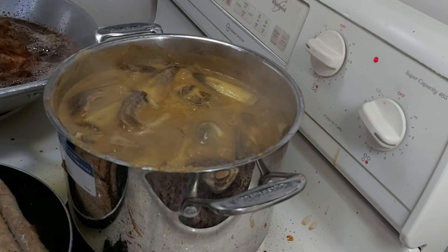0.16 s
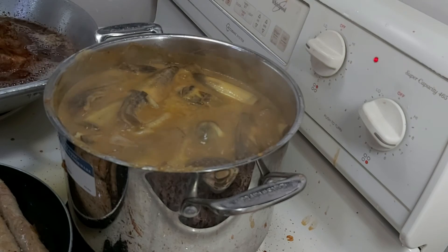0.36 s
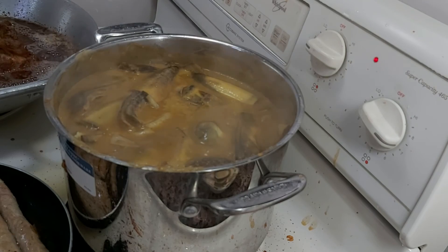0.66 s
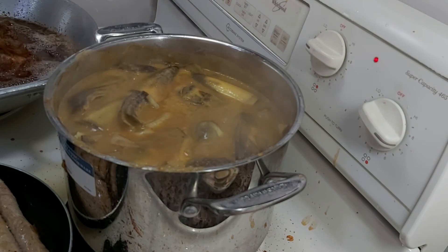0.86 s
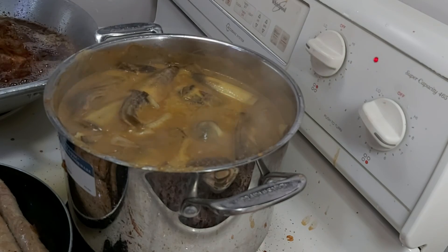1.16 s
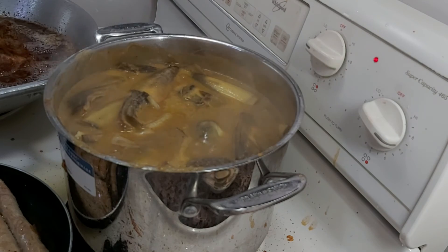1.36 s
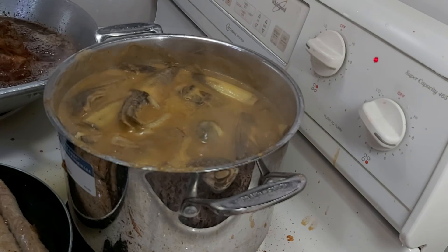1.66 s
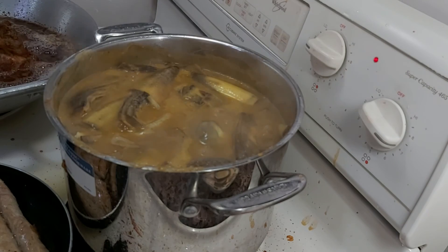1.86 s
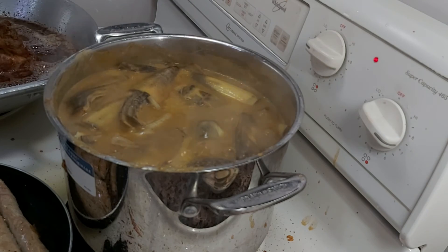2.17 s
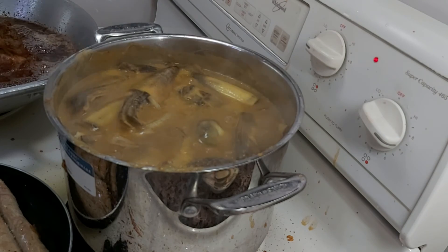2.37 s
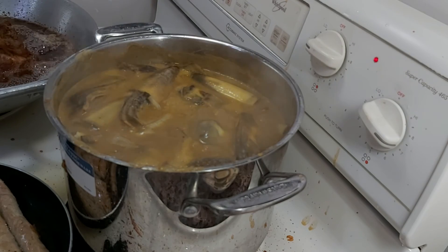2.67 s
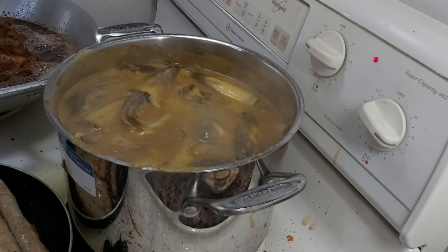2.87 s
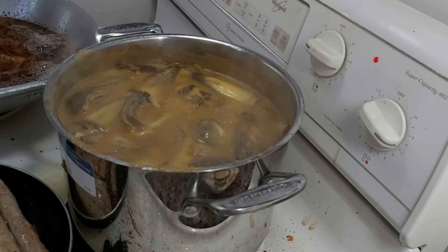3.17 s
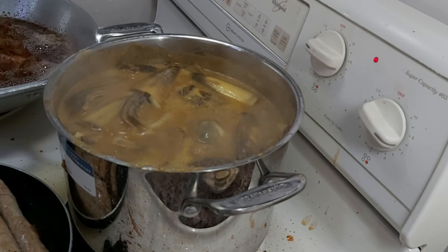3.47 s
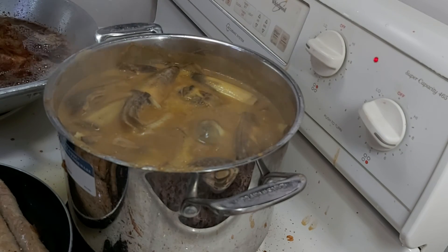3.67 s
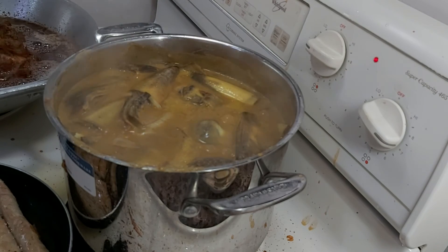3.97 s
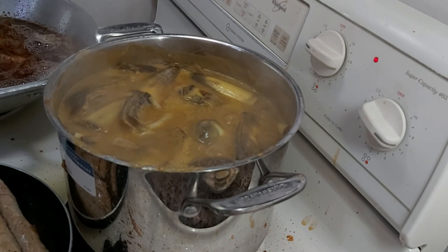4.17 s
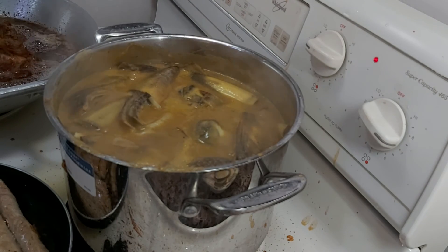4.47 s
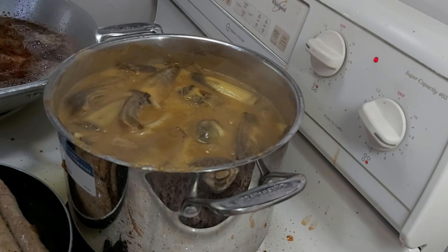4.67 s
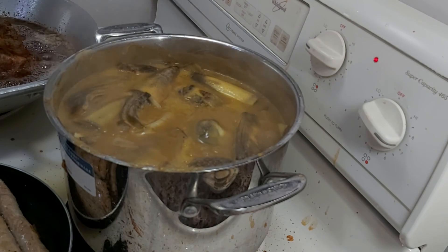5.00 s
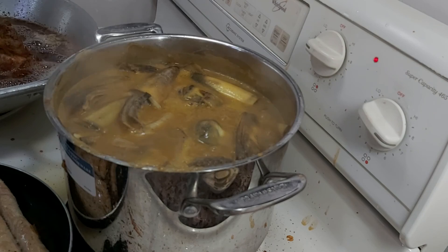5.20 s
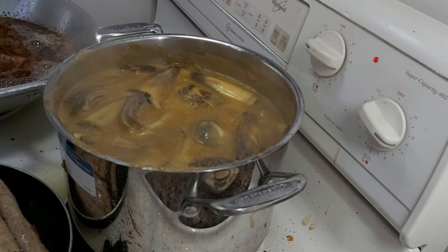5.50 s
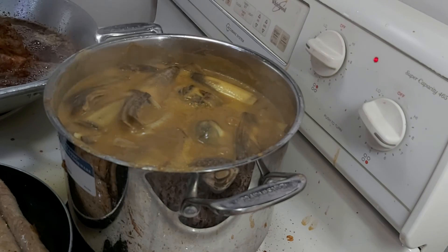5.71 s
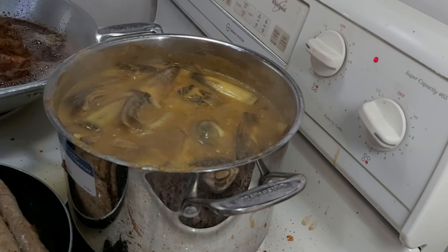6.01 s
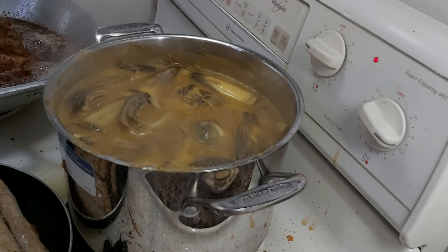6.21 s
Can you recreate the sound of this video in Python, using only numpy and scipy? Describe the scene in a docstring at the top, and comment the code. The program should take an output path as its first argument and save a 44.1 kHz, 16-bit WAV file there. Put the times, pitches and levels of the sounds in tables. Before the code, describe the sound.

A fan and a low electrical hum drone steadily in a kitchen. Slightly to the right, a pot of stew gives off a hiss of steam that soon thins to soft bubbling, splutters and wet ticks. Near the end comes a dull, hollow knock, then a quick run of ringing metal clanks and a softer knock, as the stew keeps simmering.

```python
"""A kitchen, at an electric stove, with the pot a little right of a stereo pair of microphones.
Behind it drone a cooling fan, a compressor and mains hum. Thick stew simmers in the steel pot: steam hisses
for two seconds, then thins to fizz, small bubbles and spits. Late on, something is set down with a dull
knock and metal cookware clanks a few times; the recorder's gain control ducks and creeps back."""
import sys
import numpy as np
from scipy import signal
from scipy.fft import rfft, irfft
from scipy.io import wavfile
from scipy.ndimage import uniform_filter1d, map_coordinates

SR = 44100
rng = np.random.default_rng(int(sys.argv[2]) if len(sys.argv) > 2 else 0)


def persist_wave(psi):
    """Save psi, clipped to +-1, as 16-bit WAV."""
    counts = np.round(np.clip(psi, -1, 1) * 32767).astype(np.int16)
    wavfile.write(sys.argv[1], SR, np.atleast_2d(counts).T)


N = 279934
TIME = np.arange(N) / SR
FREQS = np.fft.rfftfreq(N, 1 / SR)


def undb(db):
    """Decibels to gain."""
    return 10 ** (np.asarray(db) / 20)


def unit(x):
    """Scale to rms 1."""
    return x / np.sqrt(np.mean(x ** 2))


def sides(pan_db):
    """Gains at the two microphones for a left-minus-right level difference."""
    return undb(np.array([[.5], [-.5]]) * pan_db)


def curve(table):
    """A table of levels in time, sample by sample."""
    return np.interp(TIME, *np.transpose(table))


def across(table, column=1):
    """One column of a spectrum table, interpolated over log frequency."""
    rows = np.array(table)
    return np.interp(np.log(FREQS + 1), np.log(rows[:, 0]), rows[:, column])


def colour(x, spectrum):
    """Filter by a spectrum table and scale to rms 1."""
    return unit(irfft(rfft(x) * undb(across(spectrum)), N))


def noise(spectrum):
    """Unrelated left and right noise of one colour, rms 1."""
    return colour(rng.standard_normal((2, N)), spectrum)


def walk(per_s):
    """Smoothly joined random values, spread about 1."""
    knots = rng.standard_normal(1024)
    return map_coordinates(knots, [TIME * per_s], order=3, mode="wrap")


def fade(t60, size=22050):
    """Exponential decay, 60 dB in t60 seconds."""
    return np.exp(-np.log(1000) * TIME[:size] / t60)


def add(out, s, sound):
    """Mix a sound in at s seconds."""
    start = max(int(s * SR), 0)
    out[:, start:start + sound.shape[-1]] += sound[..., :max(N - start, 0)]


def bursts(times, levels_db, spectrum, t60, tail_db, tail_t60):
    """A quick burst of noise at each time, with a weaker, longer tail."""
    decay_power = fade(t60) ** 2 + (undb(tail_db) * fade(tail_t60)) ** 2
    power = np.zeros((1, N))
    for s, db in zip(times, levels_db):
        add(power, s, undb(db) ** 2 * decay_power)
    return np.sqrt(power) * noise(spectrum)


def scatter(x, t60, wet_db, size=22050):
    """Direct sound plus dense reflections, different at each microphone."""
    echoes = rng.standard_normal((2, size)) * fade(t60, size)
    echoes *= undb(wet_db) / np.sqrt(np.sum(echoes ** 2) / 2)
    return x + signal.fftconvolve(x, echoes, axes=1)[:, :N]


# moving air in the background: f/Hz, level/dB per Hz
AIR_SPECTRUM = [(20, -75), (45, -71), (90, -60.5), (150, -65), (250, -64.5), (300, -69.5), (420, -60.5),
                (520, -64.5), (680, -61), (880, -62), (1200, -72), (1600, -71), (3500, -78.5),
                (16000, -91.5)]
# resonances of the fan housing: f/Hz, width/Hz, lift/dB
HOUSING_RESONANCES = [(210.4, 34, 12), (365.8, 65.5, 14.5)]
# the air at the two microphones: f/Hz, likeness/0-1, left minus right/dB
AIR_AT_MICS = [(60, 0.6, -10), (200, 0.91, -6), (380, 0.99, -7), (705, 0.47, -4), (1400, 0, -1.5),
               (5000, 0, -1)]


def fan_air():
    """The fan's rush, lifted by its housing; the bass is alike at both microphones."""
    db = across(AIR_SPECTRUM)
    for hz, width, lift_db in HOUSING_RESONANCES:
        db += lift_db / (1 + (2 * (FREQS - hz) / width) ** 2)
    likeness, pan_db = across(AIR_AT_MICS), across(AIR_AT_MICS, column=2)
    mid, side = rfft(rng.standard_normal((2, N)))
    mid *= np.sqrt((1 + likeness) / 2)
    side *= np.sqrt((1 - likeness) / 2)
    rush = irfft(np.array([mid + side, mid - side]) * undb(db) * sides(pan_db), N)
    return np.sqrt(SR / 2) * rush * undb(.4 * walk(7))


# tones of the five-bladed fan, mostly to the right: multiple of shaft rate, level/dB, left minus right/dB
FAN_HARMONICS = [(1, -52, -4), (2, -49.5, 1), (3, -52.5, -8), (5, -27, -3), (10, -34, -10), (15, -45, 3),
                 (17, -47, -6)]
# slow swell of the blade tone: t/s, level/dB
BLADE_SWELL = [(0, -1), (1.8, 1.6), (2.7, -2.3), (3.5, -1.1), (5.4, 0.5), (6.35, -1.5)]
# compressor shaft and mains hum, to the right: f/Hz, level/dB, left minus right/dB
HUM_TONES = [(58.2, -26, -5), (119.95, -38, -2.5), (352, -44.5, -2)]


def motors(blade_hz=219.45, blades=5, wander=.0012, flutter_db=.84):
    """The compressor and mains hum steadily; the fan's tones flutter in its own turbulence."""
    shaft_hz = blade_hz / blades * (1 + wander * walk(2.396))
    shaft_phase = 2 * np.pi * np.cumsum(shaft_hz) / SR
    out = np.zeros((2, N))
    for order, db, pan_db in FAN_HARMONICS:
        swell_db = curve(BLADE_SWELL) if order == blades else 0
        gain = undb(db + swell_db + flutter_db * walk(12))
        out += sides(pan_db) * gain * np.sin(order * shaft_phase + 2 * np.pi * rng.random())
    for hz, db, pan_db in HUM_TONES:
        gain = undb(db + .087 * walk(.46))
        out += sides(pan_db) * gain * np.sin(2 * np.pi * (hz * TIME + rng.random()))
    return np.sqrt(2) * out


# dull knocks, right of centre: t/s, level/dB, thump relative to that level/dB
KNOCK_HITS = [(4.5753, -16, -1), (4.586, -23.5, 14), (4.602, -18.5, -3), (4.621, -24.5, 4), (5.42, -26, 6)]
# colour of the contact: f/Hz, level/dB
KNOCK_SPECTRUM = [(100, -20), (300, 2), (850, 7.5), (1300, 2), (2500, -8), (4500, -14.5), (7000, -15.5),
                  (16000, -17.5)]
# hollow note of the knocked surface: f/Hz, level/dB, t60/s
HOLLOW_MODES = [(228, -5, 0.1), (327.6, -4, 0.19), (757, -15, 0.13)]


def knocks():
    """Something is set down: a rattling contact, a low thump and the hollow note of the surface below."""
    times, db, thump_db = np.transpose(KNOCK_HITS)
    contact = bursts(times, db, KNOCK_SPECTRUM, t60=.092, tail_db=-7, tail_t60=.4)
    thump_spectrum = [(60, -34), (130, -18), (195, -5), (250, -9),
                      (335, 0), (520, -8), (1200, -30), (16000, -70)]
    thump = bursts(times, db + thump_db - 7, thump_spectrum, t60=.071, tail_db=-10, tail_t60=.31)[0]
    note = sum(undb(mode_db) * fade(t60, N) * np.sin(2 * np.pi * hz * TIME)
               for hz, mode_db, t60 in HOLLOW_MODES)
    hollow = np.zeros((1, N))
    for s, level_db in zip(times, db + thump_db):
        add(hollow, s, undb(level_db) * note)
    return (contact + thump + hollow) * sides(-3.5)


# blows of the cookware, right of centre: t/s, ring/dB, crack/dB, clunk/dB, spot/0 rim to 1 wall
COOKWARE_BLOWS = [(4.8753, -23, -19.5, -18, .1), (4.8809, -15, -18, -9, 0),
                  (4.933, -23.5, -24.5, -16.5, 0.06), (4.989, -25, -23, -21, 0.97),
                  (5.1191, -20.5, -28.5, -20, 1), (5.231, -27, -19, -17, 1), (5.2618, -31, -18, -26, 0.88),
                  (5.2683, -19.5, -24, -19, 0.69)]
# modes of the metal: f/Hz, level struck at the rim/dB, level struck at the wall/dB, t60/s
COOKWARE_MODES = [(622, -7, -10, .16), (657, -8, -17, .24), (782, -8, -20, .13), (1040, -18, -7, .1),
                  (1118, -15, 0, .11), (1150, -15, -6, .13), (1205, -14, -10, .26), (1526, -2.5, -16, .26),
                  (1688, -7, -11, .26), (1808, -8, -8, .2), (1850, 0, -7, .23), (1882, -12, -3, .24),
                  (1926, -3, -11, .16), (2038, -3, -20, .09), (2370, -13, -22, .08), (2712, -11, -19, .15),
                  (2790, -9, -10, .12), (2950, -21, -15, .15), (4215, -19, -24, .18), (8301, -29, -29, .2)]
# colours of a metal contact's sharp crack and duller clunk: f/Hz, level/dB
CRACK_SPECTRUM = [(300, -14), (1200, -2), (2200, -.5), (2800, 0), (3400, -4), (4200, 1.5), (5500, -2),
                  (6600, -3), (8300, .5), (10000, -3.5), (12500, -5.5), (16000, -15)]
CLUNK_SPECTRUM = [(200, -20), (620, -1), (900, -7), (1150, -5), (1400, -3), (1900, 3), (2130, -7),
                  (2350, -6), (2530, -11), (2750, -5), (3200, -20), (5000, -24), (16000, -45)]


def cookware(detune=.0011, chatter_db=2.5, lower_from_s=5.2, lower_ratio=.975):
    """Each blow cracks, clunks and rings the metal; the spot struck sets the mix of modes."""
    times, ring_db, crack_db, clunk_db, spots = np.transpose(COOKWARE_BLOWS)
    hz, rim_db, wall_db, t60 = np.transpose(COOKWARE_MODES)
    decays = np.array([fade(t) for t in t60])
    age = TIME[:decays.shape[1]]
    ring = np.zeros((2, N))
    for s, db, spot in zip(times, ring_db, spots):
        drift, start, lag = rng.standard_normal((3, len(hz)))
        pitch = hz * (lower_ratio if s > lower_from_s else 1) * (1 + detune * drift)
        # each mode reaches the two microphones with its own phase
        mic_offsets = np.array([start, start + lag / 4])[:, :, None]
        phase = 2 * np.pi * (np.outer(pitch, age) + mic_offsets)
        strength = undb(db + (1 - spot) * rim_db + spot * wall_db)
        add(ring, s, (strength[:, None] * decays * np.sin(phase)).sum(axis=1))
    ring *= undb(chatter_db * walk(140))  # the loose contact makes the ring chatter
    crack = bursts(times, crack_db, CRACK_SPECTRUM, t60=.06, tail_db=-11, tail_t60=.42)
    clunk = bursts(times, clunk_db, CLUNK_SPECTRUM, t60=.055, tail_db=-15, tail_t60=.55)
    return (scatter(ring, t60=.4, wet_db=-12) + crack + clunk + rattles(times, crack_db)) * sides(-3)


def rattles(blow_times, crack_db, count=3, within_s=.12, drop_db=7.5, fade_db_per_s=61):
    """The metal rebounds faintly at random moments after each blow, weaker the later it falls."""
    times = np.repeat(blow_times, count)
    slots = np.arange(len(times)) % count
    delay = within_s * (slots + rng.random(len(times))) / count
    db = np.repeat(crack_db, count) - drop_db - fade_db_per_s * delay
    return bursts(times + delay, db, CRACK_SPECTRUM, t60=.03, tail_db=-13, tail_t60=.2)


# colour of the steam hiss at the pot: f/Hz, level/dB
STEAM_SPECTRUM = [(500, -12), (1500, -3.5), (3200, -2.6), (4200, -1.2), (5200, -3.3), (6700, -3.5),
                  (7700, -.7), (9800, 0), (11900, 2.2), (13500, -2), (16000, -4.5)]
# colour of bursting films, in fizz and froth: f/Hz, level/dB
FILM_SPECTRUM = [(2000, -16), (5300, -8.5), (8500, 0), (12000, 0), (15000, -4), (16000, -8)]


def steam(jet_db=-29.5, vent_closes_s=2.01, simmer_db=-47, fizz_db=-51, count=1500):
    """A jet blows until its vent closes, leaving a quiet hiss and the fizz of many tiny bursts."""
    since = np.maximum(TIME - vent_closes_s, 0)
    drop_db = 5 * np.minimum(since / .019, 1) + 13.5 * since  # drops at once, then dies away
    jet = undb(jet_db - drop_db + .82 * walk(24.6))
    hiss = noise(STEAM_SPECTRUM) * np.hypot(jet, undb(simmer_db + 3.1 * walk(25.1)))
    ticks = np.zeros((2, N))
    for when, strength, place in rng.random((count, 3)):
        tick_db = 5 * min(-np.log(1 - strength), 4)  # many weak, few strong
        add(ticks, when * N / SR, undb(tick_db) * sides(16 * (place - .5)))
    fizz = colour(scatter(ticks, t60=.02, wet_db=6), FILM_SPECTRUM)
    return (hiss + undb(fizz_db) * fizz) * sides(-2.4)


def bubble(hz, cycles, glide=.13, size=1500):
    """A bubble rings for some cycles, rising a little as it opens."""
    age = TIME[:size] * hz / cycles
    phase = 2 * np.pi * cycles * (age + glide * np.minimum(age, 2) * age / 2)
    return np.sin(phase) * np.exp(-np.pi * age)


# the bubbling in the pot swells twice, then calms: t/s, level/dB
BUBBLING_SWELL = [(0, -43), (2.2, -39.5), (2.9, -42.5), (3.6, -43), (4.15, -41.5), (4.75, -43), (6.35, -45)]


def bubbling(low_hz=1000, high_hz=5700, spread_db=4, surge_db=.8, count=3000):
    """Small bubbles, mostly of middling size, open all over the stew and echo between the pot's walls."""
    out = np.zeros((2, N))
    for when, width, depth, strength, place in rng.random((count, 5)):
        hz = low_hz * (high_hz / low_hz) ** ((width + depth) / 2)
        gain = undb(spread_db * min(-np.log(1 - strength), 3.5))
        gain *= (hz / low_hz) ** .3  # high bubbles die sooner but start harder
        add(out, when * N / SR, gain * sides(10 * (place - .5)) * bubble(hz, cycles=12))
    level_db = curve(BUBBLING_SWELL) + surge_db * walk(8.4)
    return unit(scatter(out, t60=.3, wet_db=1)) * undb(level_db) * sides(-2.7)


# the loudest splutters in the pot: t/s, relative level/dB, f/Hz
LOUD_SPLUTTERS = [(0.1605, -23, 2500), (0.374, -28, 3250), (0.657, -24, 2310), (0.739, -28, 2210),
                  (0.821, -23, 2450), (1.205, -21, 2950), (1.405, -24.5, 2200), (2.038, -19.5, 2570),
                  (2.08, -22, 3920), (2.655, -23.5, 2800), (2.72, -21, 2880), (3.1916, -19.5, 3500),
                  (3.419, -25, 2240), (3.507, -23, 3680), (3.733, -30, 2880), (3.953, -29, 2330),
                  (4.102, -20, 3270), (4.249, -27, 2500), (4.274, -23, 2280), (4.325, -32, 2200),
                  (4.54, -25.5, 3570), (5.401, -23, 3700), (5.778, -21, 2300), (5.983, -30, 2760)]


def splutters(count=6, within_s=.016, attack_s=.0004):
    """A larger bubble breaks up into a quick cluster of smaller ones of nearly the same pitch."""
    out = np.zeros((2, N))
    attack = 1 - np.exp(-TIME[:1500] / attack_s)
    for s, db, hz in LOUD_SPLUTTERS:
        for late, pitch in rng.random((count, 2)):
            blip = attack * bubble(hz * (.84 + .26 * pitch), cycles=8)
            add(out, s + within_s * late ** 2, undb(db + 1 - 6 * late) * blip)
    return scatter(out, t60=.045, wet_db=1) * sides(-2)


def snap(hz, q=.98, t60=.0038, size=1024):
    """One film tears: a very short tick, brightest around its own pitch."""
    resonance = signal.iirpeak(hz, q, fs=SR)
    tick = rng.standard_normal((2, size))
    for _ in range(2):
        tick = signal.lfilter(*resonance, tick)
    return unit(tick) * fade(t60, size)


def sprinkle(*ranges, count):
    """Random event rows, loosely spread in time: t/s, then one value from each range."""
    low, high = np.transpose(ranges)
    chance = rng.random((count, 1 + len(ranges)))
    times = (np.arange(count) + chance[:, 0]) / count * N / SR
    return np.column_stack([times, low + chance[:, 1:] * (high - low)])


# the loudest spits at the stew's surface: t/s, relative snap level/dB, snap f/Hz, froth level/dB
LOUD_SPITS = [(0.408, -8.5, 12000, -28), (0.595, -16, 11500, -36), (0.8026, -15, 13500, -37),
              (1.3553, -15, 12000, -34), (2.082, -28, 11500, -26.5), (2.171, -15, 11500, -42),
              (2.4548, -26, 12000, -38), (2.7655, -24, 7000, -37), (2.8404, -28, 9000, -42),
              (3.0709, -24, 6500, -37), (3.2226, -26, 10000, -42), (3.256, -26, 11500, -38),
              (3.7186, -22, 10500, -38), (3.735, -24, 10500, -28), (3.8715, -23, 11000, -33),
              (3.8876, -13.5, 11000, -31), (3.899, -20, 9500, -34), (3.992, -25, 11000, -35),
              (4.0178, -26, 9000, -29), (4.077, -28, 10500, -32), (4.0893, -24, 10500, -31),
              (4.3335, -31, 12000, -32), (4.385, -25, 10000, -40), (4.9638, -19, 12000, -30),
              (4.9864, -25, 10000, -31), (5.099, -25, 10500, -38), (5.603, -31, 7940, -40),
              (5.6495, -26, 12900, -44), (5.784, -26, 11000, -33.5), (5.8125, -33, 12500, -44),
              (5.852, -27, 9000, -39), (5.9474, -22, 12500, -31.5), (5.9633, -23, 13500, -34),
              (6.155, -30, 10800, -41)]


def spits(snap_gain_db=2, body_db=-3.5):
    """The thin films of bursting bubbles snap with a bright tick and a wet body; the froth fizzles on."""
    faint_spits = sprinkle((-26, -27), (5000, 13500), (-45, -42), count=36)  # columns as above
    times, snap_db, snap_hz, froth_db = np.vstack([LOUD_SPITS, faint_spits]).T
    ticks = np.zeros((2, N))
    for s, db, hz in zip(times, snap_db, snap_hz):
        add(ticks, s, undb(db + snap_gain_db) * snap(hz))
    wet_spectrum = [(800, -20), (2500, -2), (4200, 0), (7000, -14), (16000, -30)]
    body = bursts(times, froth_db + body_db, wet_spectrum, t60=.025, tail_db=-4, tail_t60=.15)
    froth = bursts(times, froth_db, FILM_SPECTRUM, t60=.054, tail_db=-6.5, tail_t60=.4)
    return (scatter(ticks, t60=.058, wet_db=-7.5) + body + froth) * sides(-1.7)


def scene():
    """The kitchen drone, the pot and the handling noises as they reach the microphones."""
    drone = motors() + fan_air()
    pot = steam() + bubbling() + splutters() + spits()
    return drone + pot + knocks() + cookware()


def record(dry, threshold_db=-14.5, slope=.33, recovery_s=15, top_hz=15780):
    """The recorder's gain control ducks on loud peaks and recovers slowly; the top is cut."""
    loudness = np.sqrt(uniform_filter1d(np.mean(dry ** 2, axis=0), size=600) + 1e-12)
    leak = np.exp(-TIME / recovery_s)
    held_peak = np.maximum.accumulate(loudness / leak) * leak
    gain = np.minimum(undb(threshold_db) / held_peak, 1) ** slope
    lowpass = signal.ellip(10, .2, 80, top_hz, fs=SR, output="sos")
    return signal.sosfilt(lowpass, dry * gain)


dry = scene()
out = record(dry)
persist_wave(out)
```